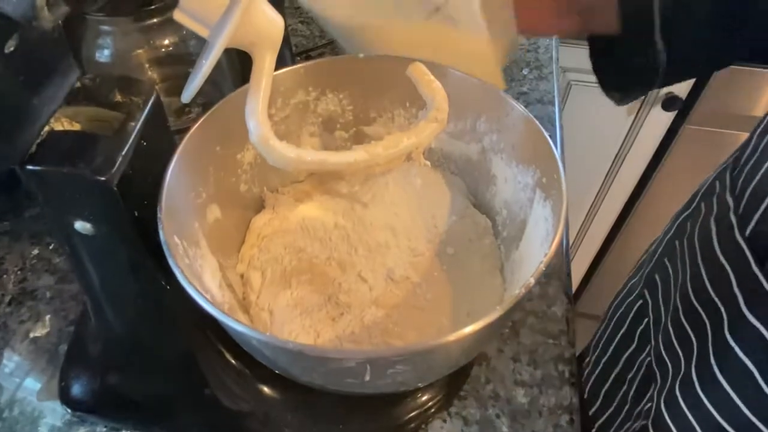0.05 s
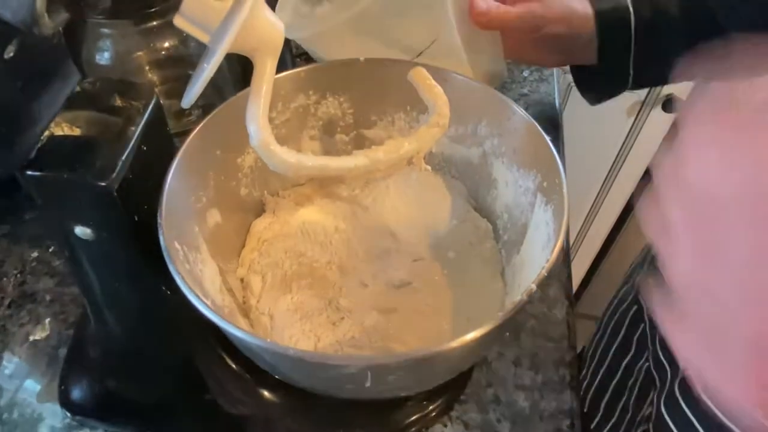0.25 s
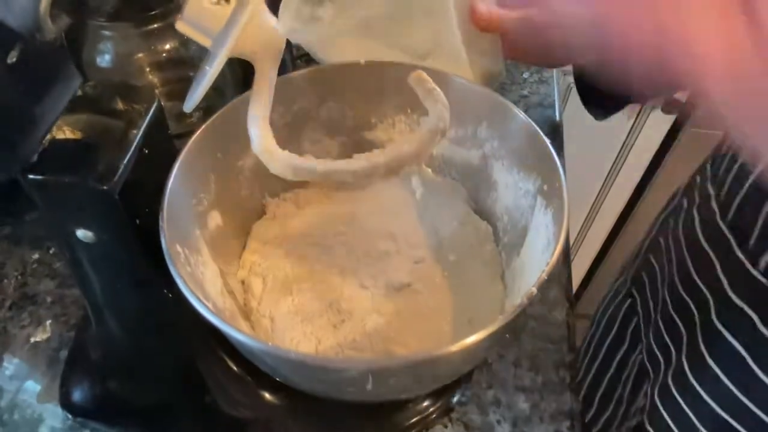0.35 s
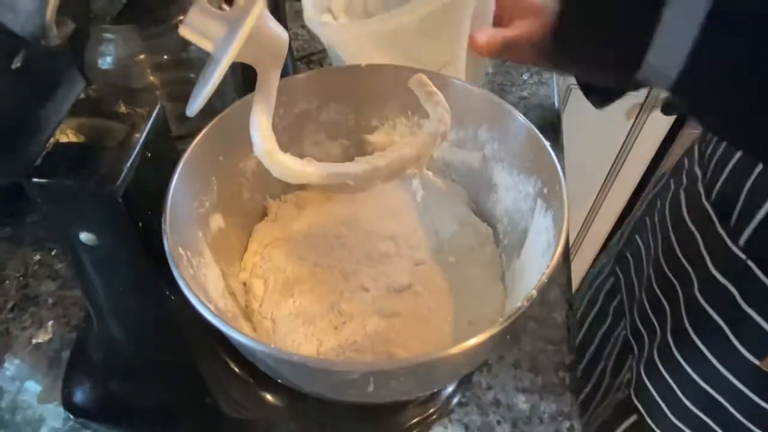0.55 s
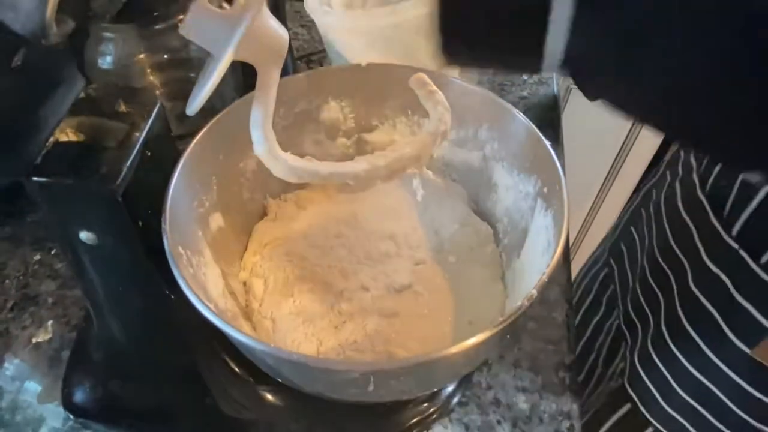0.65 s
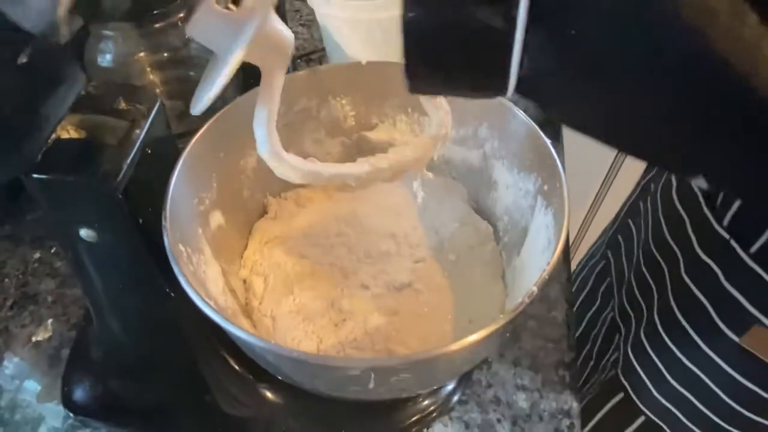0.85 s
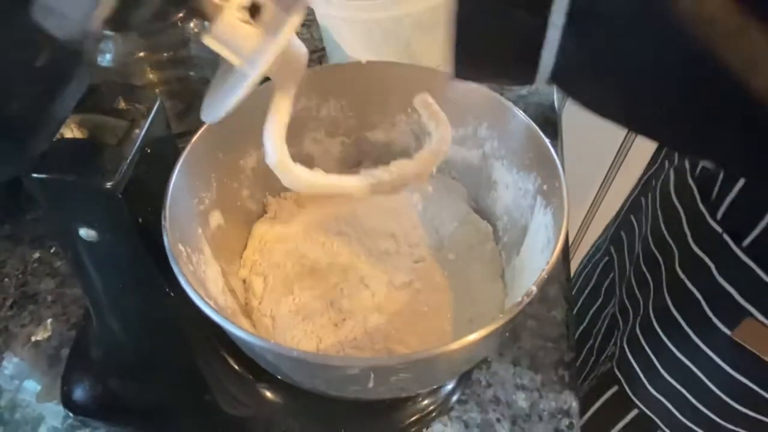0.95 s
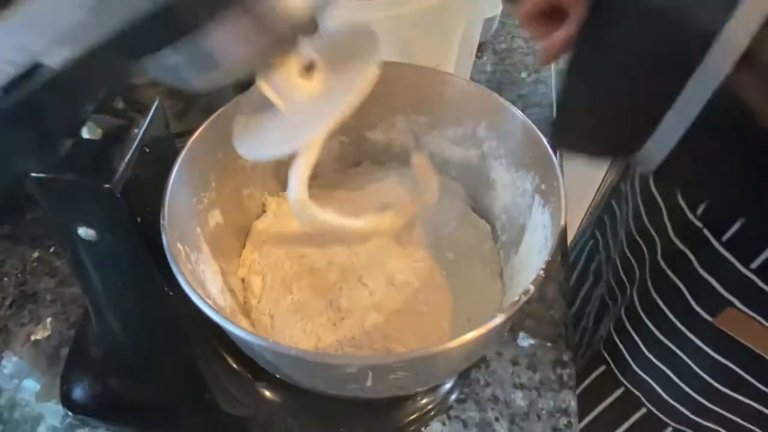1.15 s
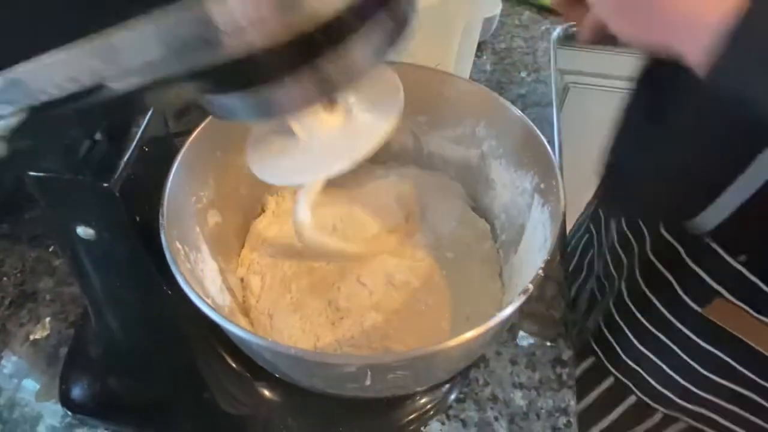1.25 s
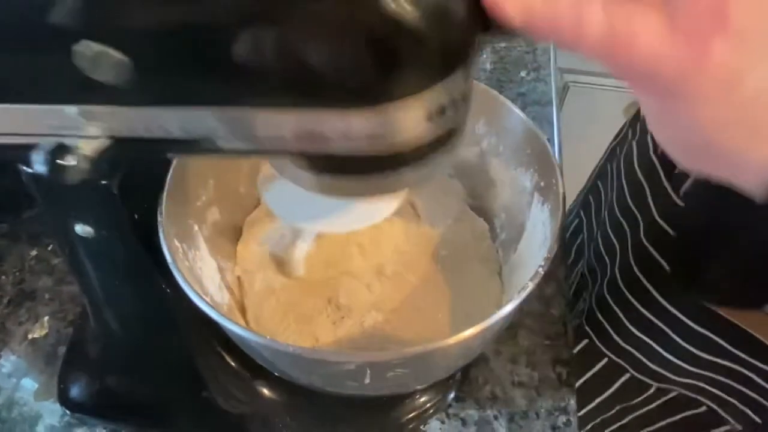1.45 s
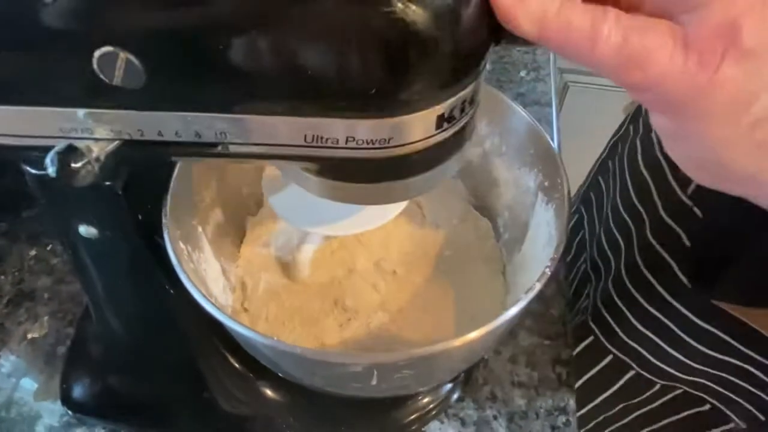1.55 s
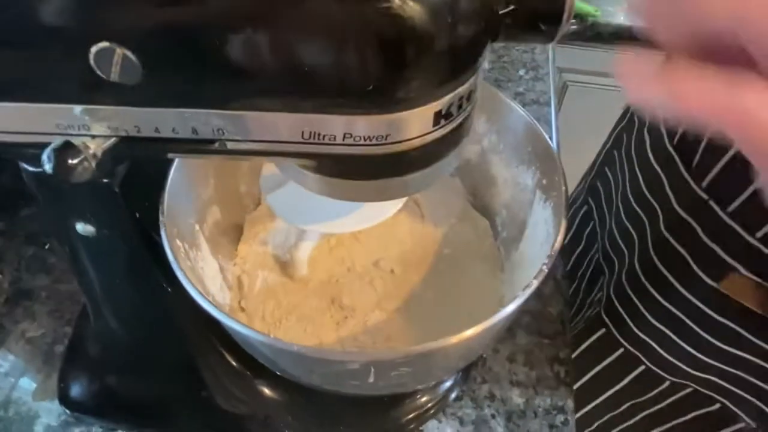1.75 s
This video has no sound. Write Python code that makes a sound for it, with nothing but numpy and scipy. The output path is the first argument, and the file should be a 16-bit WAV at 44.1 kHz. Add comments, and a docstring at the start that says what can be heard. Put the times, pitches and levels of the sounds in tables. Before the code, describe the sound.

A stand mixer head drops onto its stop, close up in a small quiet kitchen. Faint room air and low appliance hum run throughout, with tiny plastic squeaks and sleeve brushes. A dull thump lands at 0.2 s, a hollow plastic tub knock at 0.74 s, soft hinge ticks near 1.3 s, then at 1.44 s a loud metallic clank chatters for 0.1 s, booming and ringing briefly.

```python
"""Stand mixer head dropping onto its stop

A small, quiet kitchen with a stone counter, heard from close above the mixer bowl: a dull thump and a hollow
knock as a plastic flour tub is put aside, then hinge ticks and the heavy tilt head dropping and chattering.
Contacts are damped modes and decaying noise bands, sent through a noise reverberation; the head also excites
casting resonances, rings the housing and steel bowl and makes the counter boom.
Sine tones make the appliance hum and faint squeaks; shaped noise makes the room air and sleeve brushes."""
import sys
import numpy as np
from scipy import signal
from scipy.fft import rfft, irfft
from scipy.io import wavfile
from scipy.ndimage import uniform_filter1d

SR = 44100
rng = np.random.default_rng(int(sys.argv[2]) if len(sys.argv) > 2 else 0)


def to_wav(sig):
    """Store sig (one row per channel, or 1-D mono) as 16-bit WAV at the path in sys.argv[1].

    Samples outside -1..1 are clipped; the rate is SR.
    """
    pcm = np.clip(np.atleast_2d(sig), -1, 1) * 32767
    pcm = np.round(pcm).astype(np.int16)
    wavfile.write(sys.argv[1], SR, pcm.T)  # frames by channels


N = 79380  # length in samples

# the two channels part above WIDE_HZ: side-to-mid ratios of treble and bass
WIDE_HZ, WIDTH, BASS_WIDTH = 860, 1, 0.37
LEFT_RIGHT = np.array([[1], [-1]])  # sign of the side signal in each channel


def undb(db):
    """Decibels to gain."""
    return 10 ** (np.asarray(db) / 20)


def since(start):
    """Seconds since start, zero before it."""
    return np.maximum(np.arange(N) / SR - start, 0)


def fade(t, rise, t60):
    """Smooth attack with a time constant in seconds, and exponential decay by 60 dB in t60 seconds."""
    attack = (1 - np.exp(-t / rise)) ** 2
    return attack * np.exp(-np.log(1000) * t / t60)


def swell(centre, width):
    """A short bell-shaped rise and fall."""
    return np.exp(-.5 * ((since(0) - centre) / width) ** 2)


def walk(rate):
    """Slow random wander of unit spread, smoothed from `rate` random steps per second."""
    k = int(SR / rate)
    steps = np.repeat(rng.standard_normal(N // k + 1), k)
    wander = uniform_filter1d(uniform_filter1d(steps, k), k)[:N]
    return wander / wander.std()


def spread(hz):
    """Side-to-mid ratio: the bass is nearly central, the treble wide."""
    return BASS_WIDTH + (WIDTH - BASS_WIDTH) * hz ** 2 / (hz ** 2 + WIDE_HZ ** 2)


def bands(table):
    """Half-octave stereo noises, each with the table's columns read at its centre."""
    table = np.array(table, float)
    freq = np.arange(N // 2 + 1) * SR / N
    centres = 22 * 2 ** (np.arange(20) / 2)
    mid, side = rfft(rng.standard_normal((2, N)))
    for hz in centres:
        shape = np.maximum(1 - 2 * np.abs(np.log2((freq + 1) / hz)), 0)  # triangle on an octave scale
        ratio = spread(hz)
        stereo = irfft(shape * (mid + ratio * side * LEFT_RIGHT), N)
        noise = stereo / np.sqrt(np.mean(shape ** 2) * (1 + ratio * ratio))  # unit RMS
        columns = [np.interp(np.log(hz), np.log(table[:, 0]), col) for col in table.T[1:]]
        yield hz, noise / 2, columns


def hiss(colour):
    """Steady stereo noise of a given colour."""
    return sum(noise * undb(db) for _, noise, (db,) in bands(colour))


def burst(table, start, tilt_db=0):
    """Dense, short-lived resonances of a contact, each band with its own decay; tilt is in dB per octave."""
    rise_s, rise_cycles = 0.00026, 0.085  # low resonances take longer to build
    t, out = since(start), 0
    for hz, noise, (db, t60) in bands(table):
        octaves = np.clip(np.log2(hz / 1000), -2, 2)  # the tilt pivots about 1 kHz
        out = out + noise * undb(db + tilt_db * octaves) * fade(t, rise_s + rise_cycles / hz, t60)
    return out


def ring(modes, start, rise_cycles):
    """Damped modes that swell over some of their cycles; the higher ones differ in phase between channels."""
    t, out = since(start), 0
    for k, (hz, db, t60) in enumerate(modes):
        side = (-1) ** k  # neighbouring modes lean opposite ways
        skew = side * np.arctan(WIDTH * hz / np.hypot(hz, WIDE_HZ)) * LEFT_RIGHT
        out = out + undb(db) * fade(t, rise_cycles / hz, t60) * np.sin(2 * np.pi * hz * t + skew)
    return out


def background():
    """Room air, noise whose treble drifts, and an appliance hum of sines wavering in level and phase."""
    # Colour of the room air. Each row: frequency in Hz, level in dB per octave before the drift.
    air_colour = [(25, -87.5), (60, -62.5), (110, -63), (170, -56.5), (260, -60), (450, -57), (900, -64),
                  (2000, -68), (4000, -76), (8000, -81.5), (14000, -79.5)]
    # Drift of the air's treble. Each row: time in seconds, boost in dB approached well above hiss_hz.
    hiss_level = [(0, -9), (.17, -5.5), (.25, 3.5), (.7, 10), (.82, 1.5), (1, -5), (1.15, 9), (1.35, 2.5),
                  (1.8, 10.5)]
    # Hum tones. Each row: frequency in Hz, level in dB relative to the running hum level.
    hum_tones = [(59.4, 0.5), (177.6, -7.5), (334, -12.5), (377, -14.5)]
    # Running level of the lowest hum tone. Each row: time in seconds, level in dB.
    drone_level = [(0, -62.5), (.15, -63.5), (.45, -55.5), (.56, -64), (.72, -65), (.9, -50), (1.05, -58.5),
                   (1.4, -59), (1.8, -58)]
    hiss_hz, hum_db, waver_db, waver_rad = 5000, -55, 3, 0.52
    lag_s = np.array([[.00045], [0]])  # the hum reaches the left channel later
    t = since(0)
    treble_db = np.interp(t, *np.array(hiss_level).T)
    drone_db = np.interp(t, *np.array(drone_level).T)
    air = 0
    for hz, noise, (db,) in bands(air_colour):
        air = air + noise * undb(db + treble_db * hz / (hz + hiss_hz) + walk(9.26))
    hum = 0
    for k, (hz, db) in enumerate(hum_tones):
        level = drone_db if k == 0 else hum_db + waver_db * walk(7.41)
        phase = 2 * np.pi * (hz * (t - lag_s) + rng.random()) + waver_rad * walk(11.95)
        hum = hum + undb(db + level) * np.sin(phase)
    return air + np.sqrt(2) * hum  # the hum levels are RMS


def squeaks():
    """Faint friction tones of handled plastic: brief sines of unsteady pitch."""
    # Squeaks. Each row: centre in seconds, half width in seconds, pitch in Hz, level in dB.
    squeak_list = [(.01, .02, 2775, -65.5), (.07, .012, 2850, -69.5), (.35, .012, 2116, -67),
                   (.9, .025, 4020, -74.5)]
    jitter, out = 0.032, 0  # spread of the pitch as a fraction
    for s, width, hz, db in squeak_list:
        pitch = hz * (1 + jitter * walk(400))
        out = out + undb(db) * swell(s, width) * np.sin(2 * np.pi * np.cumsum(pitch) / SR)
    return out


def sleeve():
    """A sleeve brushes past: short swells of cloth noise."""
    # Strokes of the cloth. Each row: centre in seconds, half width in seconds, level in dB.
    brushes = [(0.048, 0.054, -71), (.35, 0.0077, -71), (0.569, 0.012, -60), (1.77, 0.028, -70.5)]
    # Colour of the cloth noise. Each row: frequency in Hz, level in dB per octave relative to the stroke.
    brush_colour = [(500, -10), (1600, 2), (3300, 0), (7000, -4.5), (9500, -16), (14000, -19)]
    return hiss(brush_colour) * sum(undb(db) * swell(s, width) for s, width, db in brushes)


def thump():
    """A soft, heavy contact with the counter: slowly swelling low modes and contact noise."""
    # Modes of the thump. Each row: frequency in Hz, level in dB, t60 in seconds.
    thump_modes = [(103, -9.5, 0.076), (187.2, 9, 0.035), (210, -33, 0.2), (302.8, -1, 0.039),
                   (443, -22, .06), (577, -17, 0.052)]
    # Contact noise. Each row: frequency in Hz, level in dB per octave, t60 in seconds.
    thump_noise = [(99.8, -46.5, 0.19), (247, -29.5, 0.24), (540, -29, 0.14), (990, -40, 0.13),
                   (2180, -43, .08), (4500, -69, 0.12), (11700, -68, 0.041)]
    start_s, rise_cycles = .2045, 1.26
    return ring(thump_modes, start_s, rise_cycles) + burst(thump_noise, start_s)


def counter_and_neck():
    """Heavy contacts set off the counter's low boom; the head's weight also flexes the cast neck."""
    # Low modes of the counter. Each row: frequency in Hz, level in dB relative to the jolt, t60 in seconds.
    counter_modes = [(42, -16, 0.21), (61.1, -12.5, 0.21), (91.8, -18, .18)]
    # Contacts that jolt the counter. Each row: start in seconds, level in dB.
    counter_jolts = [(.211, -11.5), (1.447, 0)]
    # Modes of the flexing neck. Each row: frequency in Hz, level in dB relative to the jolt, t60 in seconds.
    neck_modes = [(166.5, -9.5, 0.11), (181.7, -17, 0.11)]
    # The head's landing and rebound. Each row: start in seconds, level in dB.
    neck_jolts = [(1.446, 0), (1.499, -2.5)]
    boom = sum(undb(db) * ring(counter_modes, s, .45) for s, db in counter_jolts)
    flexing = sum(undb(db) * ring(neck_modes, s, 0.98) for s, db in neck_jolts)
    return boom + flexing


def knock():
    """The tub's edge touches as a noise burst, then its base lands and the hollow modes sound."""
    # Modes of the hollow tub. Each row: frequency in Hz, level in dB, t60 in seconds.
    knock_modes = [(306, -16.5, 0.048), (425, -14.5, 0.034), (535, -13.5, 0.039), (636, -27, 0.032)]
    # Contact noise of the edge. Each row: frequency in Hz, level in dB per octave, t60 in seconds.
    knock_noise = [(100, -52.5, 0.17), (400, -36, 0.051), (895, -26.5, 0.028), (1490, -30, 0.08),
                   (2210, -41.5, 0.068), (3200, -48, 0.089), (4870, -51.5, 0.057), (12000, -70, 0.028)]
    edge_s, base_lag_s, rise_cycles = .7387, 0.00303, 0.67
    return burst(knock_noise, edge_s) + ring(knock_modes, edge_s + base_lag_s, rise_cycles)


def hinge():
    """The pivot slips softly as the head swings down, each tick ringing a few damped modes."""
    # Soft ticks. Each row: start in seconds, level in dB, rise in cycles.
    hinge_ticks = [(1.273, -38, 0.55), (1.319, -32, 3.1)]
    # Modes of a tick. Each row: frequency in Hz, level in dB relative to the tick, t60 in seconds.
    hinge_modes = [(337, -4, 0.069), (377.5, 1, 0.082), (1270, -18.5, 0.054)]
    return sum(undb(db) * ring(hinge_modes, s, rise) for s, db, rise in hinge_ticks)


def bowl_modes(count=36):
    """The steel bowl's thin overtones, scattered over the treble and tending weaker as they go up."""
    low_hz, high_hz, t60_s = 1885, 8070, 0.21
    low_db, db_per_octave, scatter_db = -34, -11.5, 3
    place, strength = rng.random(count), rng.standard_normal(count)
    octaves = np.log2(high_hz / low_hz) * (np.arange(count) + place) / count  # one overtone per equal slot
    levels = low_db + db_per_octave * octaves + scatter_db * strength
    return [(low_hz * 2 ** octave, db, t60_s) for octave, db in zip(octaves, levels)]


def head():
    """The head chatters on its stop through the casting; the hardest blow sets housing and bowl ringing."""
    # Blows on the stop. Each row: start in seconds, level in dB, brightness in dB per octave.
    head_blows = [(1.4347, -5.5, 2), (1.438, 1.5, 0.5), (1.4416, -4, 0), (1.448, -4, 2.5),
                  (1.457, -6.5, 1.5), (1.479, -6, -6), (1.485, -9.5, -13), (1.526, -18, -9.5)]
    # Metal clash. Each row: frequency in Hz, level in dB per octave before the blow's level and
    # brightness, t60 in seconds.
    clash = [(152, -49.5, 0.046), (350, -27.5, 0.045), (585, -25, 0.069), (940, -24.5, 0.039),
             (1740, -25, 0.058), (2570, -31, 0.095), (3670, -32.5, .05), (5860, -37, 0.088),
             (9000, -39.5, 0.062), (14300, -43.5, 0.072)]
    # Casting resonances that colour every blow. Each row: frequency in Hz, width in Hz, gain in dB.
    casting = [(688, 60, -0.5), (900, 29, -3), (1404, 105, -0.5), (1678, 93, 3.5), (1826, 82, 10),
               (2620, 45, -15), (2880, 37, -2), (3377, 112, 8.5), (4020, 86, 10), (5570, 96, 6)]
    # Ringing of housing and bowl. Each row: frequency in Hz, level in dB, t60 in seconds.
    head_modes = [(286.3, -33.5, 0.34), (329, -13, 0.051), (401.5, -25.5, 0.36), (574.4, -26.5, 0.25),
                  (901, -13, 0.036), (927, -33.5, 0.3), (1005.5, -27, .15), (1073, -11.5, .022),
                  (1177, -35, 0.31), (1388, -15, .035), (1692, -17, .04), (1860, -24.5, .15),
                  (2300, -33.5, .24), (3876, -37.5, 0.19)]
    hardest_s = max(head_blows, key=lambda blow: blow[1])[0]
    chatter = sum(undb(db) * burst(clash, s, tilt) for s, db, tilt in head_blows)
    clank = 0
    for hz, width, db in casting:
        b, a = signal.iirpeak(hz, hz / width, fs=SR)
        clank = clank + undb(db) * signal.lfilter(b, a, chatter)
    ringing = ring(list(head_modes) + bowl_modes(), hardest_s, 0.42)
    return chatter + clank + ringing


def kitchen():
    """Stereo response of the small room: delayed noise bands, each with its own decay."""
    # Reverberation. Each row: frequency in Hz, level in dB before the band scaling, t60 in seconds.
    room = [(60, 11, 0.52), (200, -6.5, 0.29), (500, -1.5, 0.32), (1500, -5, 0.31), (4000, -5, .3),
            (11500, -6.5, 0.29)]
    delay_s, build_s = 0.016, 0.0027
    t, out = since(delay_s), 0
    for hz, noise, (db, t60) in bands(room):
        scale = np.sqrt(20 * hz / t60) / SR  # allows for the bandwidth and length of each decay
        out = out + noise * undb(db) * fade(t, build_s, t60) * scale
    return out


def scene():
    """Every contact is heard directly and through the room, over the brushes, squeaks and background."""
    # each contact with its send to the room in dB
    sources = [(thump(), -7), (counter_and_neck(), -16.5), (knock(), -3.5), (hinge() + head(), -4)]
    direct = sum(sound for sound, _ in sources)
    send = sum(sound * undb(room_db) for sound, room_db in sources)
    echo = signal.fftconvolve(send, kitchen(), axes=1)[:, :N]
    return direct + echo + sleeve() + squeaks() + background()


def record(dry):
    """The microphone sheds the deepest rumble and cuts the top of the treble."""
    low_cut_hz, top_hz = 27, 14000
    high_pass = signal.butter(2, low_cut_hz, "high", fs=SR, output="sos")
    low_pass = signal.ellip(8, .2, 70, top_hz, fs=SR, output="sos")
    return signal.sosfilt(low_pass, signal.sosfilt(high_pass, dry))


dry = scene()
out = record(dry)
to_wav(out)
```